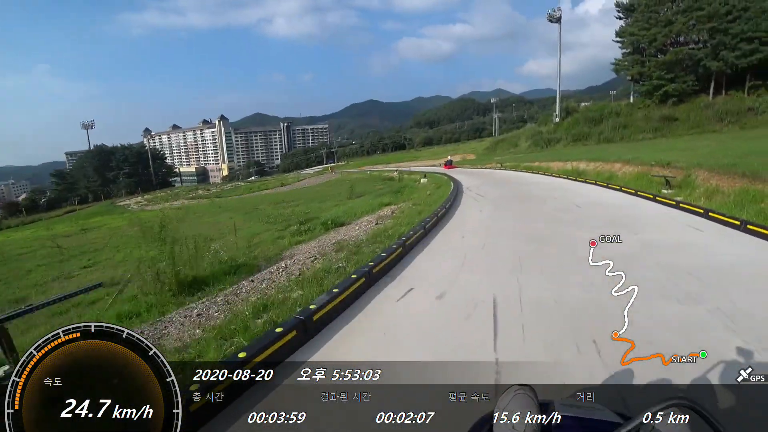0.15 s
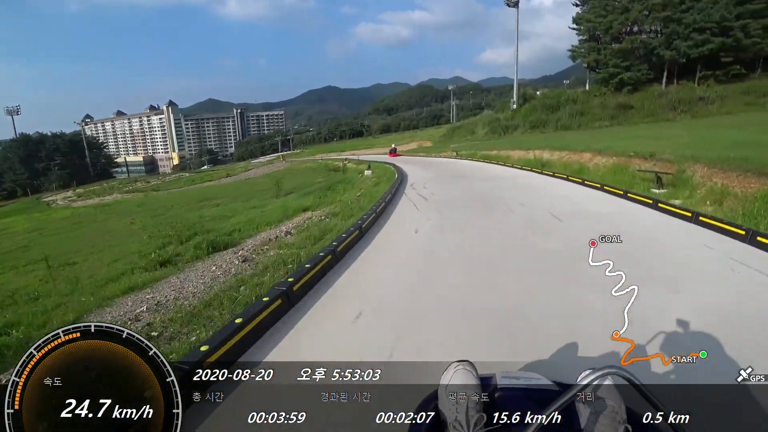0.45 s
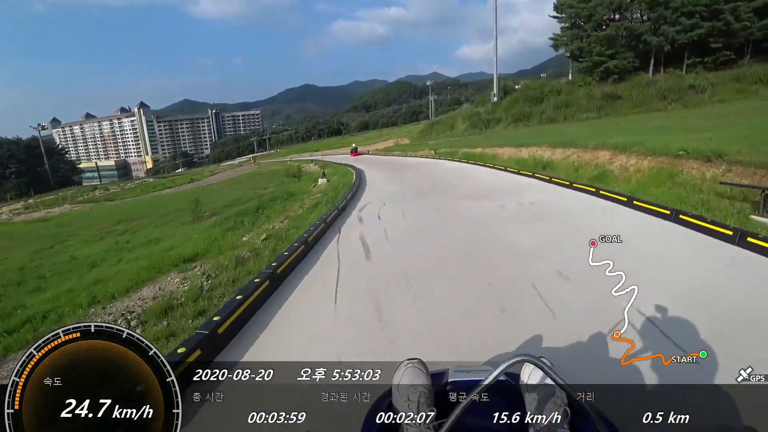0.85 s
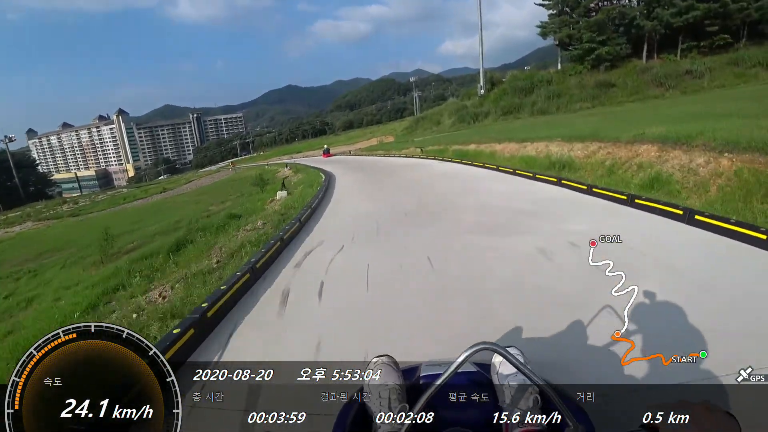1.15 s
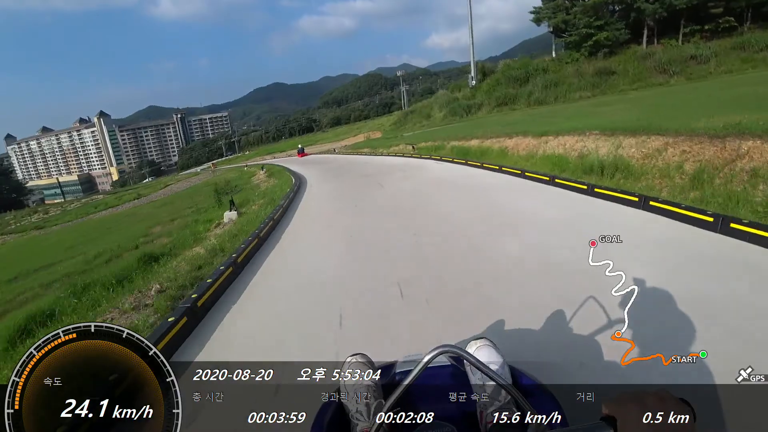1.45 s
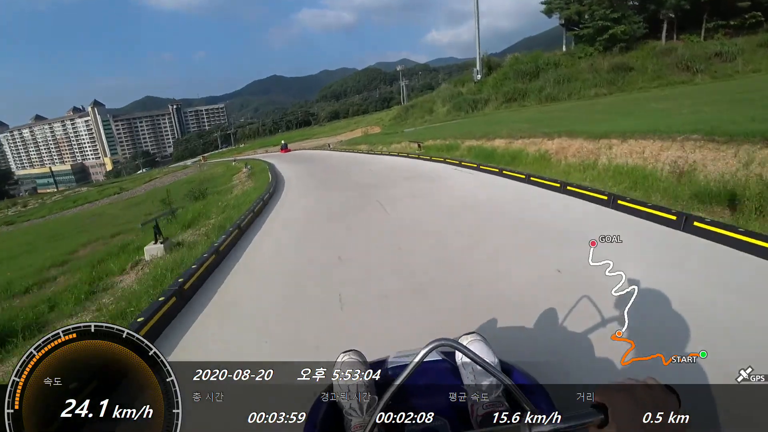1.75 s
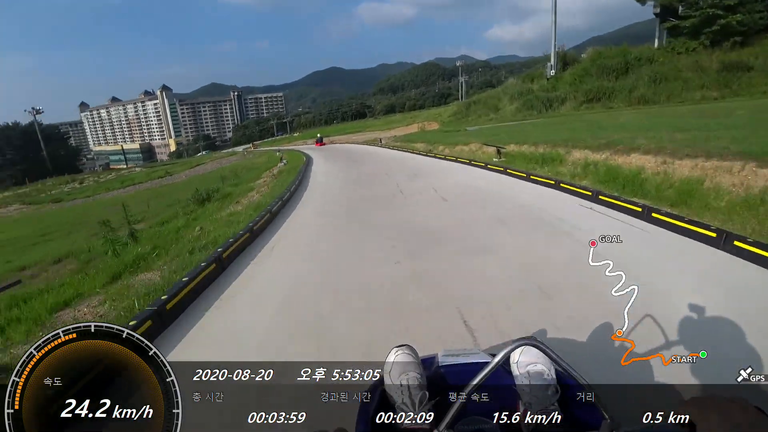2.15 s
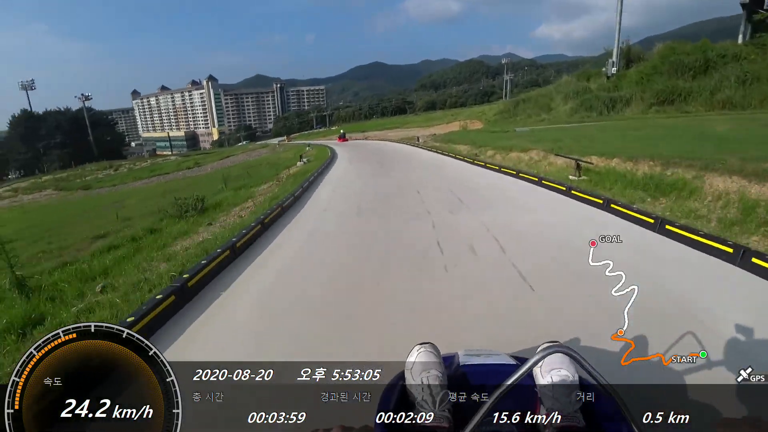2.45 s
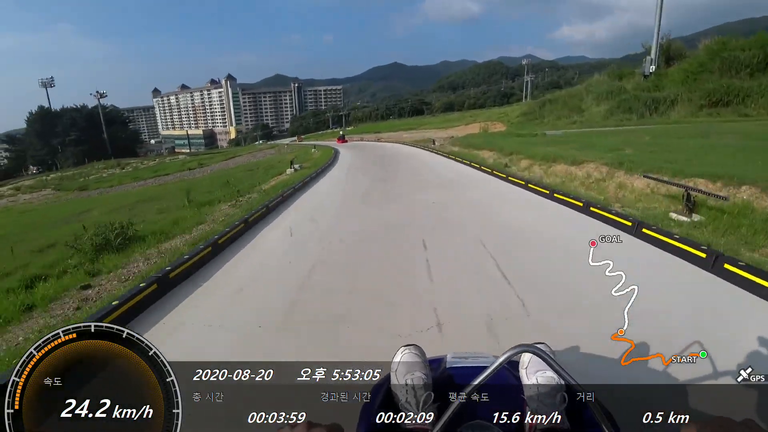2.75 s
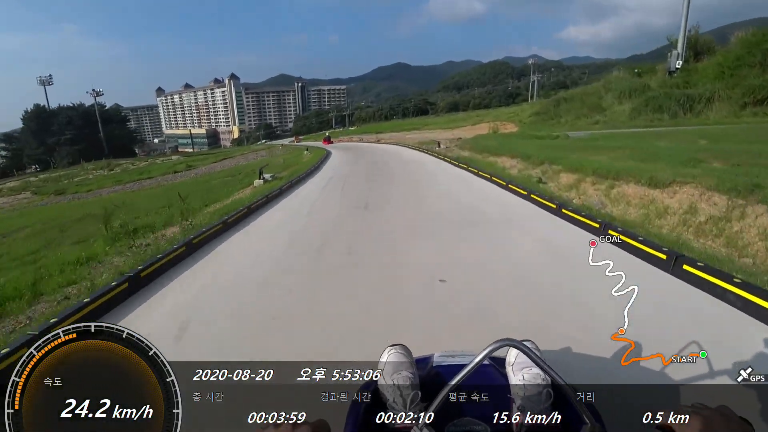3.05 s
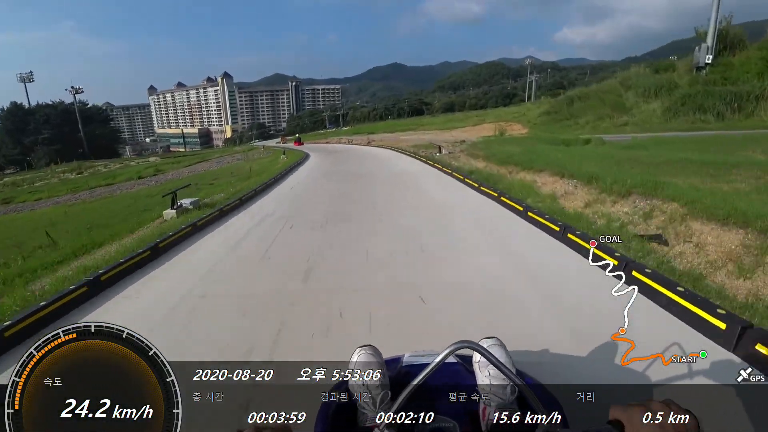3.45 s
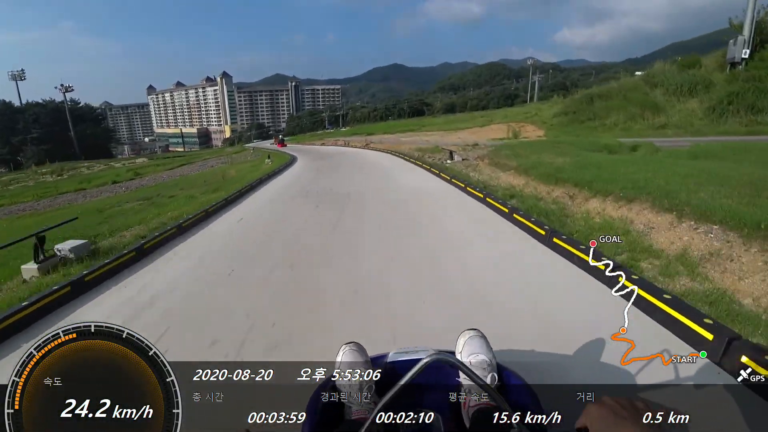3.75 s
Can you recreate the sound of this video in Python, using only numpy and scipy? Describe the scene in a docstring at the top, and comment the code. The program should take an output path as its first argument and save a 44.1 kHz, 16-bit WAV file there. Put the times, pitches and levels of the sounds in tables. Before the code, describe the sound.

A downhill cart rumbles and rattles along a concrete track, with buffeting wind and bumps.

```python
"""Hard wheels drum hollowly on concrete: a small gravity cart rolls down a track at a steady speed.
From the rider's seat, noise through the resonances of the plastic tub makes the drumming.
Bumps and knocks strike decaying panel modes and clacks, and set loose metal resonances rattling.
Shaped noise makes the head wind on the two microphone ports, and scrubs come from the tyres;
a wandering tone makes the tub boom."""
import sys
import numpy as np
from scipy import signal
from scipy.fft import rfft, irfft, next_fast_len
from scipy.io import wavfile
from scipy.ndimage import uniform_filter1d, minimum_filter1d, map_coordinates

SR = 44100
rng = np.random.default_rng(int(sys.argv[2]) if len(sys.argv) > 2 else 0)


def to_wav(s):
    """Save 16-bit WAV."""
    ch = np.atleast_2d(s).T  # columns
    pcm = np.round(np.clip(ch, -1, 1) * 32767)  # PCM
    wavfile.write(sys.argv[1], SR, pcm.astype(np.int16))


N = 172872
TIME_S = np.arange(N) / SR

# roughness of the concrete down the track: [time_s, relative_level_db]
ROUGHNESS = [(0, -33), (.5, -31), (.95, -33), (1.15, -27), (1.65, -32), (1.9, -26), (2.25, -27),
             (2.55, -23.5), (2.9, -23), (3.2, -25.5), (3.5, -25), (3.8, -21), (3.92, -27)]
# resonances of the loose metal parts: [centre_hz, width_hz, relative_level_db]
METAL_MODES = [(1881, 96, 12.5), (2953, 200, 8), (3260, 360, -1), (3900, 450, 3.5), (4550, 210, 7),
               (5100, 140, 1.5), (6130, 380, -7.5), (7820, 270, 0), (9730, 420, -9)]
# spectrum of gritty contact, in clacks and under the treads: [frequency_hz, relative_level_db]
GRITTY_SPECTRUM = [(200, 4), (700, 9.5), (1200, 17), (1600, 4.5), (2000, 6), (3200, 1.5), (5000, -4.5),
                   (6500, -7.5), (8500, -10), (11000, -20)]


def amp(db):
    """Decibels to gain."""
    return 10 ** (np.asarray(db) / 20)


def unit(x):
    """Scaled to rms 1."""
    return x / np.sqrt(np.mean(x ** 2) + 1e-20)


def burst(x):
    """Scaled to the energy of rms 1 held for 11 ms, averaged over the ports."""
    reference_s = .011
    return x / np.sqrt(np.mean(np.sum(x ** 2, -1)) / (reference_s * SR))


def roughness_db():
    """Roughness of the concrete under the cart at every sample."""
    return np.interp(TIME_S, *np.transpose(ROUGHNESS))


def wobble(rate):
    """A smooth random curve, rate knots a second."""
    return map_coordinates(rng.standard_normal(2048), [np.arange(N) * rate / SR], mode="wrap")


def filtered(x, response):
    """x times a complex response of frequency."""
    n = x.shape[-1]
    m = next_fast_len(n + 8192)  # padding leaves room for ringing
    return irfft(rfft(x, m) * response(np.fft.rfftfreq(m, 1 / SR)), m)[..., :n]


def low_passed(x, corner_hz, power):
    """x with the treble rolled off smoothly, halved at the corner."""
    return filtered(x, lambda hz: 1 / (1 + (hz / corner_hz) ** power))


def coloured(x, spectrum):
    """x through a spectrum of (frequency_hz, level_db) points, at rms 1."""
    f, db = np.transpose(spectrum)
    return unit(filtered(x, lambda hz: amp(np.interp(np.log(hz + 1), np.log(f), db))))


def rung(x, modes):
    """x through a bank of resonances of (centre_hz, width_hz, level_db)."""
    def response(hz):
        return sum(amp(db) * 1j * hz * width / (centre ** 2 - hz ** 2 + 1j * hz * width)
                   for centre, width, db in modes)
    return filtered(x, response)


def noise(side_db, size=N):
    """White stereo noise whose side lies side_db from its middle."""
    mid, side = rng.standard_normal((2, size))
    side = amp(side_db) * side
    return unit(np.array([mid + side, mid - side]))


def add(track, s, sound):
    """Mix a sound into a track at s seconds."""
    part = track[..., max(0, round(s * SR)):][..., :sound.shape[-1]]
    part += sound[..., :part.shape[-1]]


def contacts(per_s, spread_db, t60):
    """Envelope of irregular small impacts whose average strength stays near rms 1."""
    gap, size = rng.random(2000), rng.standard_normal(2000)
    at = (np.cumsum(gap * 1.6 + .2) * SR / per_s).astype(int)
    strength = amp(spread_db * np.minimum(size, 2))
    hits = np.bincount(at[at < N], strength[at < N], N)
    t = np.arange(SR // 10) / SR
    envelope = unit(signal.fftconvolve(hits, amp(-60 * t / t60))[:N])
    # even out the strength over 60 ms; the constant limits the boost of sparse stretches
    local_power = np.abs(uniform_filter1d(envelope ** 2, int(.06 * SR)))
    return unit(envelope / np.sqrt(local_power + 0.13))


def spell(s, length):
    """Envelope with a quick rise, a hold and a short release."""
    rise_s, release_t60_s = 0.0038, 0.069
    t = TIME_S - s
    return np.clip(t / rise_s + .5, 0, 1) * amp(-60 * np.clip(t - length, 0, 1) / release_t60_s)


def wind():
    """Gusts buffet each microphone port separately; slower pressure swings reach both."""
    # gusts of the head wind: [centre_s, half_width_s, relative_level_db]
    gusts = [(0.121, 0.016, -12.5), (.42, 0.03, -12), (0.558, 0.027, -12), (.85, 0.053, -18),
             (1.25, 0.06, -25.5), (1.5, 0.11, -18), (1.728, 0.044, -14), (1.829, 0.027, -20),
             (2.341, 0.1, -17.5), (3.368, 0.045, -16)]
    # spectrum of the buffeting: [frequency_hz, relative_level_db]
    buffet_spectrum = [(10, -40.5), (28, -6), (70, -1), (150, -0.5), (260, 2.5), (400, -8.5), (600, -15.5),
                       (850, -25), (1400, -37.5), (3000, -65)]
    # spectrum of the pressure swings: [frequency_hz, relative_level_db]
    sway_spectrum = [(15, -4), (30, -10.5), (70, -15), (110, -10.5), (200, -15.5), (500, -84)]
    lull_db, eddy_db, sway_db = -19, -1.67, -17
    power = amp(lull_db) ** 2
    for s, width, db in gusts:
        power = power + amp(db) ** 2 * np.exp(-((TIME_S - s) / width) ** 2)
    force = np.sqrt(power)
    eddies = amp(eddy_db * np.array([wobble(21.95), wobble(21.83)]))
    buffet = force * eddies * coloured(noise(side_db=1.5), buffet_spectrum)
    sway = unit(force ** 0.42) * coloured(noise(side_db=-12.5), sway_spectrum)
    return buffet + amp(sway_db) * sway


def boom():
    """The tub's lowest resonance swells now and then, wandering in pitch and between the ports."""
    # surges of that resonance: [centre_s, half_width_s, relative_level_db]
    surges = [(.72, .065, -17), (1.318, 0.017, -12.5), (1.889, 0.028, -15), (2.53, 0.02, -14.5),
              (2.65, .035, -15.5), (2.92, 0.062, -16.5)]
    pitch_hz, wander = 122.2, 0.0497  # wander is a fraction of the pitch
    swell = sum(amp(db) * np.exp(-((TIME_S - s) / width) ** 2 / 2) for s, width, db in surges)
    phase = 2 * np.pi * np.cumsum(pitch_hz * (1 + wander * wobble(20))) / SR
    port_phase = .5 * np.array([wobble(20), wobble(17)])
    return swell * unit(np.sin(phase + port_phase))


def ticks():
    """Loose metal parts tick all the time, a little louder on rougher concrete."""
    tick_db, rough_db = -64, roughness_db()
    strikes = contacts(per_s=75, spread_db=15, t60=0.015)
    ring = unit(rung(strikes * noise(side_db=-3.5), METAL_MODES))
    return amp(tick_db + 0.25 * (rough_db - rough_db.mean())) * ring


def rattle():
    """Loose metal parts chatter in spells; each mode's share of the strikes wavers on its own."""
    # spells of chatter: [start_s, length_s, relative_level_db, brightness_db]
    spells = [(0.157, 0.031, -45.5, 0.5), (0.483, 0.018, -44.5, -1.5), (0.602, 0.033, -44.5, -1),
              (0.758, .015, -47, -1), (1.092, 0.056, -45, -3.5), (1.185, .07, -47.5, 0.5),
              (1.31, 0.031, -36.5, 4), (1.339, 0.03, -45.5, 1), (1.461, 0.028, -43, -3),
              (1.679, 0.009, -39, 2.5), (1.812, 0.04, -42, 3), (1.917, .012, -37, 4.5),
              (2.4, 0.045, -40, 3), (2.486, .065, -38, 1), (2.834, 0.19, -45, 0.5),
              (3.317, 0.052, -41.5, 4.5), (3.452, 0.074, -39.5, 2.5)]
    rattle_db, mode_scatter_db = -2.5, 3.5
    strikes = contacts(per_s=110, spread_db=2.5, t60=0.044)
    chatter = 0
    for mode in METAL_MODES:
        favour = amp(mode_scatter_db * wobble(70))
        chatter = chatter + rung(strikes * favour * noise(side_db=-9.0), [mode])
    chatter = unit(chatter)
    dull = low_passed(chatter, 4000, 8)
    out = np.zeros((2, N))
    for s, length, db, bright_db in spells:
        # brightness lowers the dull part and lifts the rest by half as many dB
        tilted = amp(-bright_db) * dull + amp(bright_db / 2) * (chatter - dull)
        out += amp(db + rattle_db) * spell(s, length) * tilted
    return out


def scrapes():
    """The tyres scrub sideways, sticking and slipping in short, hoarse spells."""
    # scrubs of the tyres: [start_s, length_s, level_db]
    scrubs = [(1.714, 0.044, -37.5), (1.876, .012, -35), (2.483, 0.085, -38.5), (3.394, 0.068, -36.5),
              (3.571, .04, -38.5)]
    # resonances of the scrub: [centre_hz, width_hz, relative_level_db]
    scrub_modes = [(990, 400, 12.5), (1390, 400, -5), (2100, 680, -6)]
    stick_slip = contacts(per_s=110, spread_db=10.5, t60=0.037)
    slips = unit(rung(stick_slip * noise(side_db=-11), scrub_modes))
    slips = low_passed(slips, 3000, 4)
    return slips * sum(amp(db) * spell(s, length) for s, length, db in scrubs)


def thud():
    """One blow on the panels; the mix of modes differs each time and their phase from port to port."""
    # modes of the tub's panels: [pitch_hz, relative_level_db]
    panels = [(350, 4.5), (462, 4.5), (540, 4.5), (582, 5), (640, -2), (705, 1.5)]
    rise_s, t60_s, mode_scatter_db = .001, .04, 2.5
    t = np.arange(SR // 20) / SR
    shape = (1 - np.exp(-t / rise_s)) * amp(-60 * t / t60_s)
    ring = 0
    for hz, db in panels:
        gain = amp(db + rng.normal(0, mode_scatter_db))
        start_turns = rng.random() + rng.normal(0, 0.063, (2, 1))  # one start per port
        turns = hz * rng.normal(1, .02) * t + start_turns
        ring = ring + gain * np.sin(2 * np.pi * turns)
    return burst(shape * ring)


def clack():
    """A gritty noise burst of its own colour sets off a brief ring of the metal."""
    rise_s, t60_s, scatter_db, ring_db = .0009, 0.021, 1.8, -6
    t = np.arange(SR // 10) / SR
    shape = (1 - np.exp(-t / rise_s)) ** 2 * amp(-60 * t / t60_s)
    spectrum = [(hz, db + scatter_db * rng.standard_normal()) for hz, db in GRITTY_SPECTRUM]
    grit = coloured(noise(side_db=-9.5, size=len(t)), spectrum) * shape
    return burst(burst(grit) + amp(ring_db) * burst(rung(grit, METAL_MODES)))


def bumps():
    """Each bump in the track gives a clack and a short thud of the panels."""
    # bumps: [time_s, relative_clack_level_db, relative_thud_level_db]
    blows = [(.242, -50.5, -27.5), (0.266, -51.5, -24.5), (0.388, -37.5, -25), (.392, -38, -21),
             (0.4314, -45.5, -29), (.723, -49.5, -30), (0.8285, -39, -24), (.834, -43, -33),
             (1.0211, -43, -28.5), (1.1467, -43.5, -23), (1.2156, -39.5, -38), (1.2934, -48, -23.5),
             (1.404, -46.5, -25), (1.4875, -43.5, -29), (1.7739, -41, -33), (1.8384, -52.5, -21),
             (1.888, -38.5, -19.5), (1.8964, -31, -22), (1.948, -41, -22), (1.9789, -45.5, -33.5),
             (2.0487, -38.5, -26.5), (2.1321, -42.5, -25.5), (2.2019, -41, -27.5), (2.3111, -45.5, -24.5),
             (2.3878, -41.5, -24.5), (2.4384, -39, -20.5), (2.5074, -34.5, -20.5), (2.5704, -48.5, -26.5),
             (2.604, -41, -28), (2.664, -42, -24), (2.7117, -40, -27), (2.7741, -40.5, -25.5),
             (2.801, -43.5, -26), (2.8549, -38.5, -20), (3.0096, -40, -27), (3.0959, -30, -11),
             (3.162, -40, -21.5), (3.2799, -41, -23), (3.3119, -42.5, -38), (3.347, -37, -24),
             (3.4311, -41.5, -23.5), (3.4446, -37, -23.5), (3.4948, -38, -23), (3.6027, -40, -19.5),
             (3.7037, -43.5, -21.5), (3.7264, -45.5, -21.5), (3.7755, -46.5, -20.5), (3.8392, -38.5, -23),
             (3.8425, -37.5, -27)]
    clack_trim_db, thud_trim_db = 3, 3
    out = np.zeros((2, N))
    for s, clack_db, thud_db in blows:
        add(out, s - .001, amp(clack_db + clack_trim_db) * clack())
        add(out, s, amp(thud_db + thud_trim_db) * thud())
    return out


def knocks():
    """The uneven concrete keeps up a dense run of small knocks, harder where it is rougher."""
    per_s, trim_db, spread_db = 75, -3, 2
    out = np.zeros((2, N))
    for k in range(int(per_s * N / SR)):
        s = (k + rng.random()) / per_s
        rough_db = np.interp(s, *np.transpose(ROUGHNESS))
        db = rough_db + trim_db + spread_db * min(rng.standard_normal(), 1)
        add(out, s, amp(db) * thud())
    return out


def wheels():
    """The concrete's grain drums the tub, in lumps as wheel load shifts; treads crunch and hiss."""
    # resonances of the tub: [centre_hz, width_hz, relative_level_db]
    tub_modes = [(126.5, 20, 1.5), (180, 13.6, 0), (253.7, 11, 4.5), (282, 18, -7.5)]
    # spectrum of the rolling hiss: [frequency_hz, relative_level_db]
    hiss_spectrum = [(200, 9), (800, 10), (1200, 4), (1800, 2.5), (3000, -4), (5000, -10), (7000, -12.5),
                     (11000, -24)]
    drum_trim_db, grit_trim_db, hiss_db, load_swing_db = 6.5, -20.5, -43, 1.8
    rough_db = roughness_db()
    swing_db = rough_db - rough_db.mean()

    grain = contacts(per_s=100, spread_db=4.5, t60=0.07)
    drum = unit(low_passed(rung(grain * noise(side_db=-9.5), tub_modes), 600, 4))
    drum_db = rough_db.mean() + 0.92 * swing_db + drum_trim_db + load_swing_db * wobble(22)

    crunch = contacts(per_s=70, spread_db=9.0, t60=0.051)
    grit = crunch * coloured(noise(side_db=-15), GRITTY_SPECTRUM)

    hiss = coloured(noise(side_db=-3.5), hiss_spectrum)
    return (amp(drum_db) * drum + amp(rough_db + grit_trim_db) * grit
            + amp(hiss_db + 0.43 * swing_db) * hiss)


def scene():
    """All sources at the rider's seat, 1 dB stronger on the left than on the right."""
    mix = wind() + boom() + ticks() + rattle() + scrapes() + bumps() + knocks() + wheels()
    return mix * amp([[0.5], [-0.5]])


def record(dry):
    """The recorder cuts rumble, limits by the mean of its ports, clips and cuts off the top."""
    low_cut_hz, top_hz = 22, 11100
    limit, limit_s = .56, .003  # limit is a share of full scale
    dry = filtered(dry, lambda hz: 1 - 1 / (1 + (hz / low_cut_hz) ** 4))
    needed = limit / np.maximum(np.abs(dry.mean(0)), limit)
    span = int(limit_s * SR)
    gain = uniform_filter1d(minimum_filter1d(needed, 2 * span), span)  # turns down ahead of peaks
    return filtered(np.clip(dry * gain, -1, 1), lambda hz: hz < top_hz)


dry = scene()
out = record(dry)
to_wav(out)
```